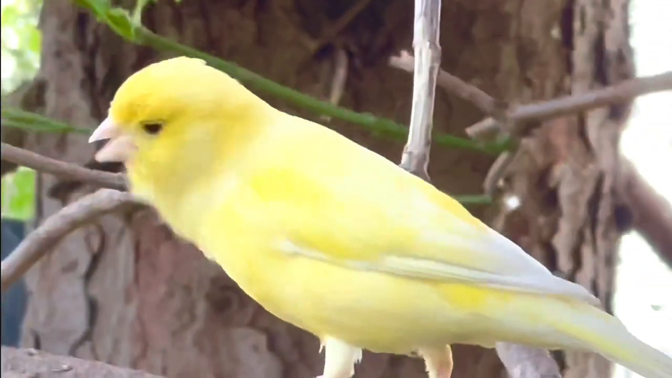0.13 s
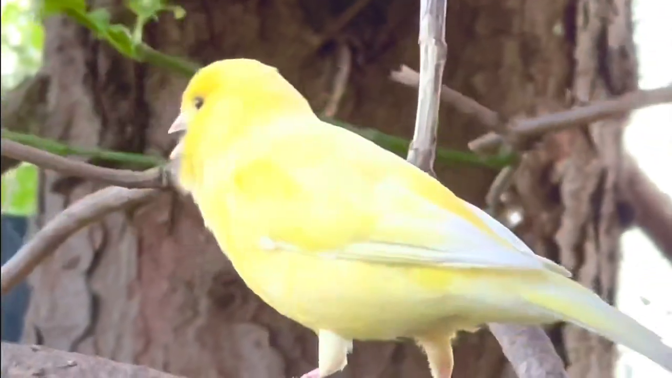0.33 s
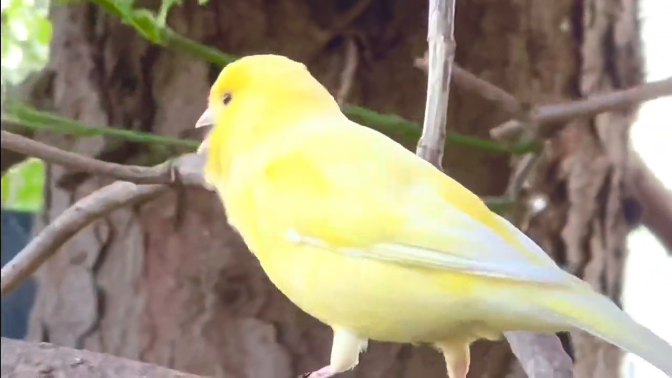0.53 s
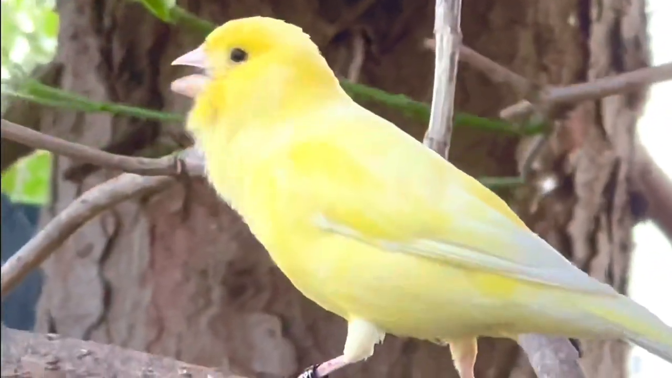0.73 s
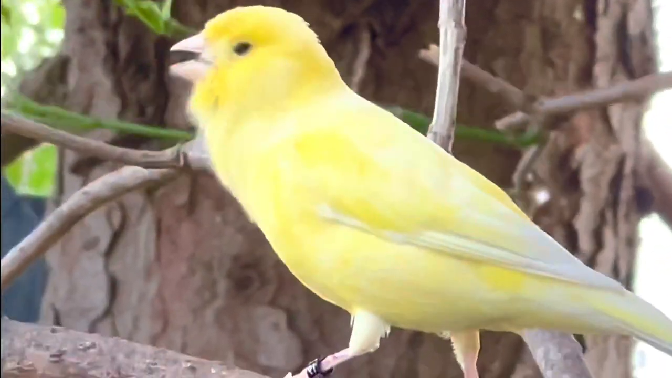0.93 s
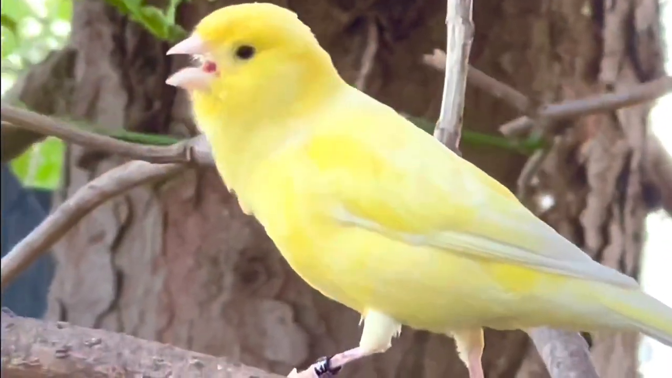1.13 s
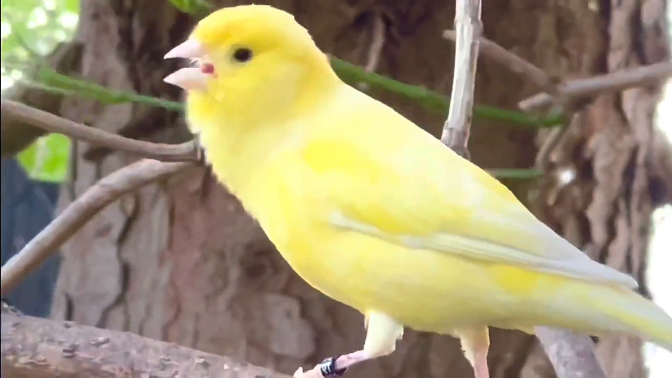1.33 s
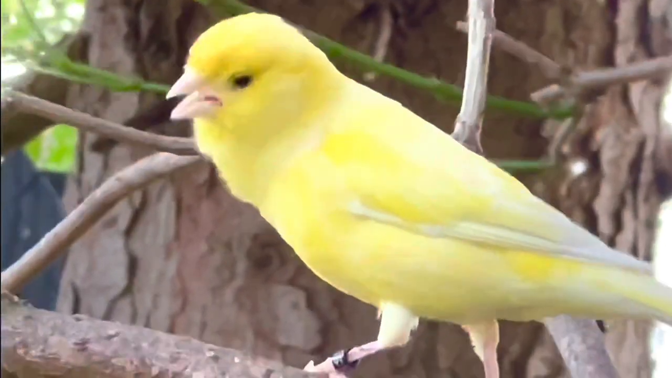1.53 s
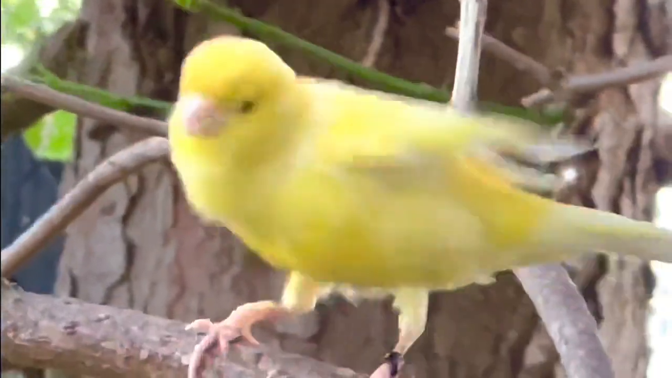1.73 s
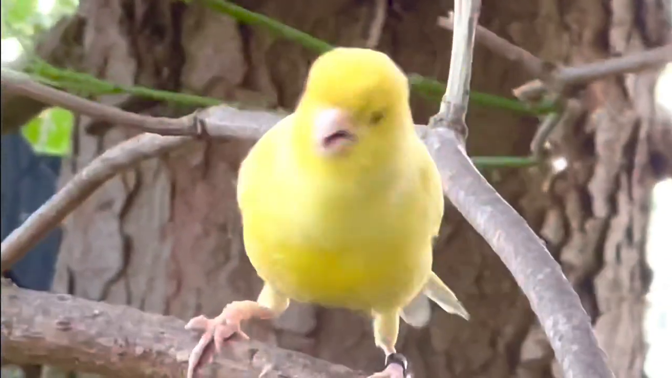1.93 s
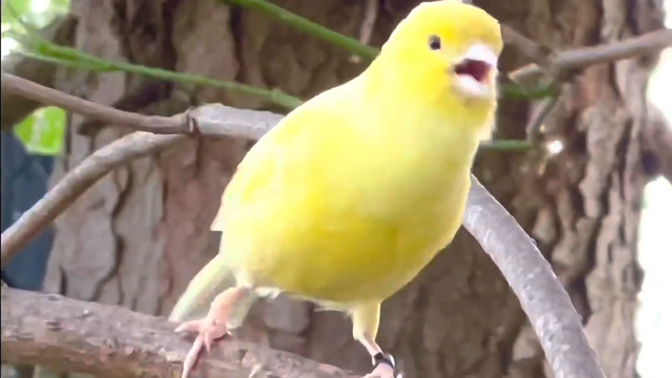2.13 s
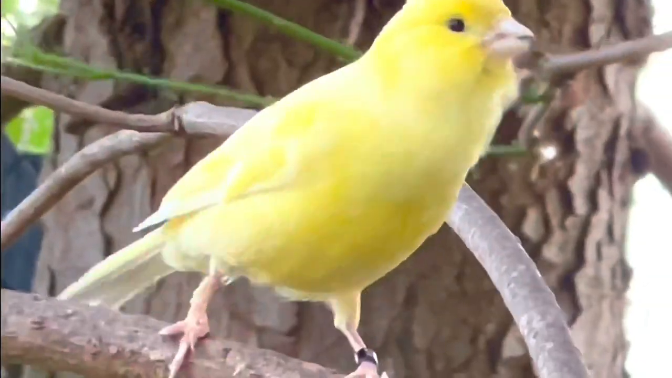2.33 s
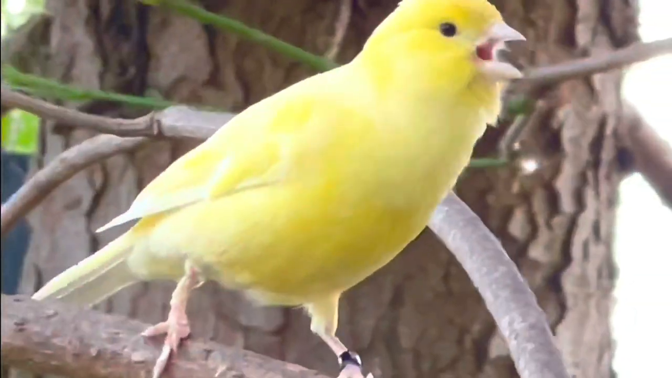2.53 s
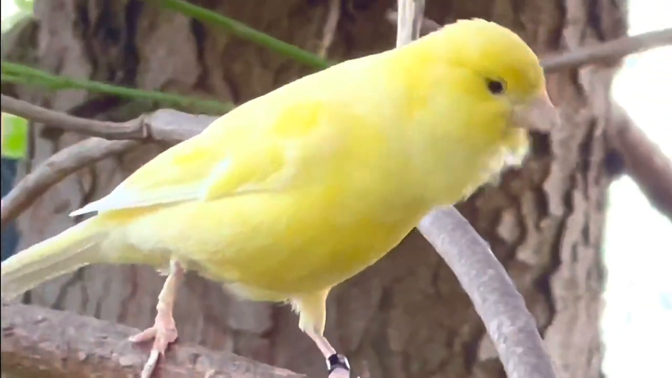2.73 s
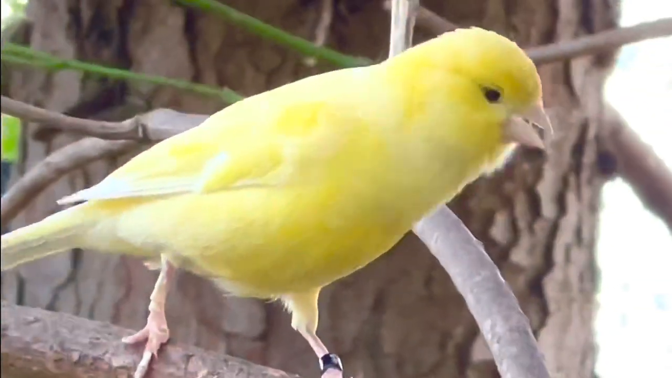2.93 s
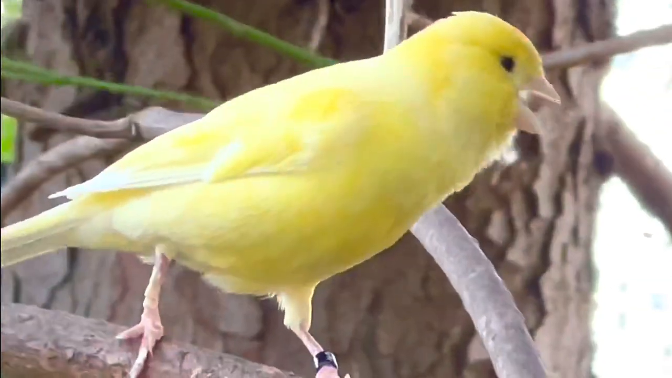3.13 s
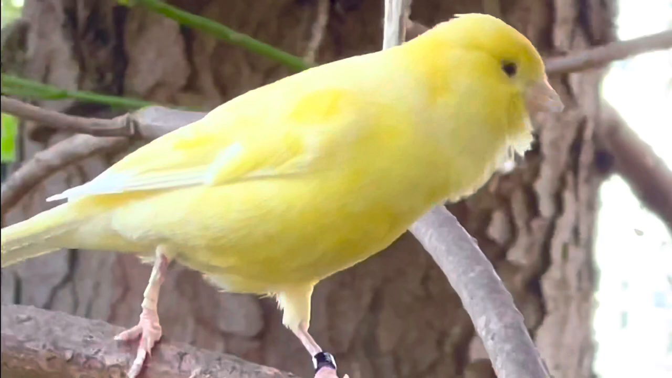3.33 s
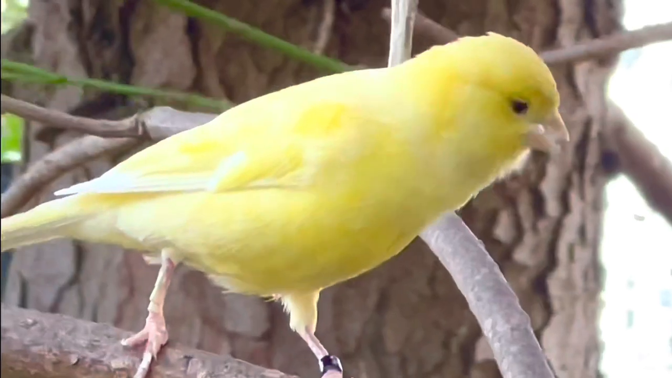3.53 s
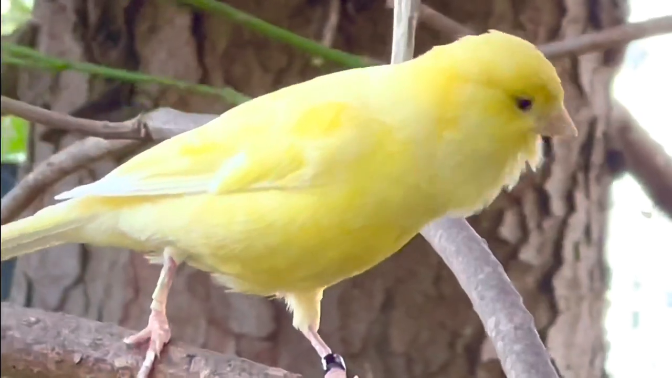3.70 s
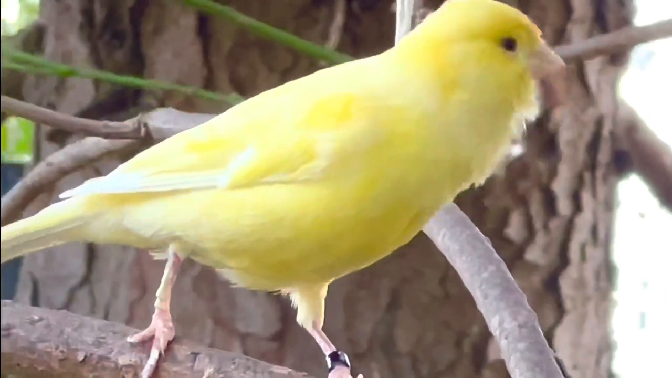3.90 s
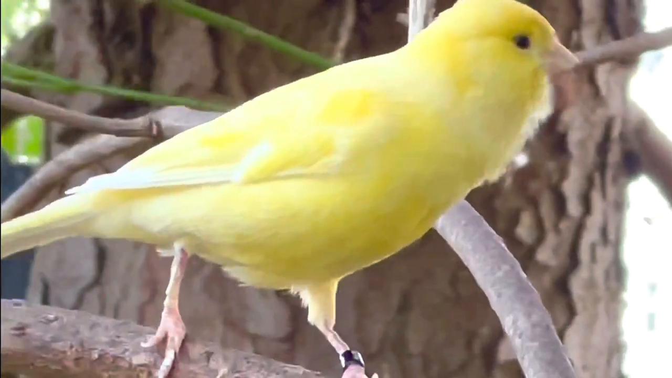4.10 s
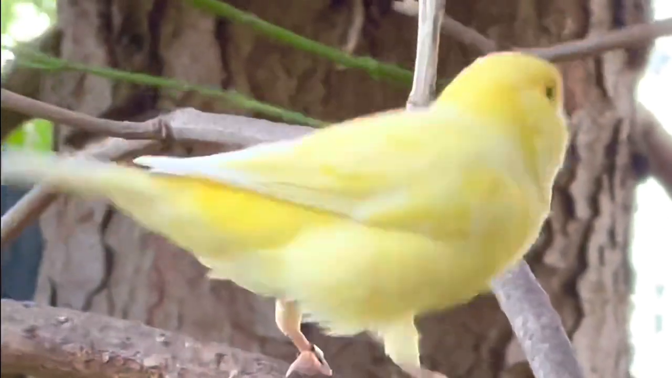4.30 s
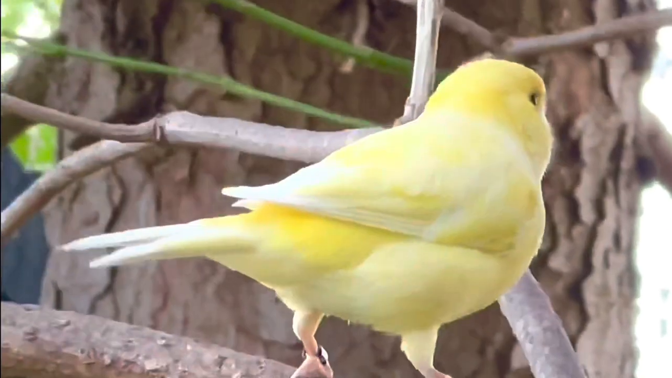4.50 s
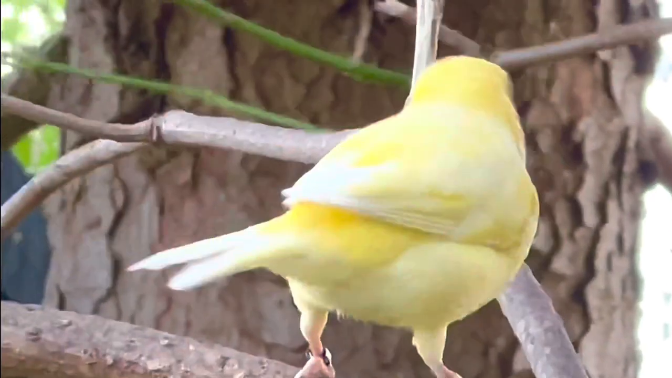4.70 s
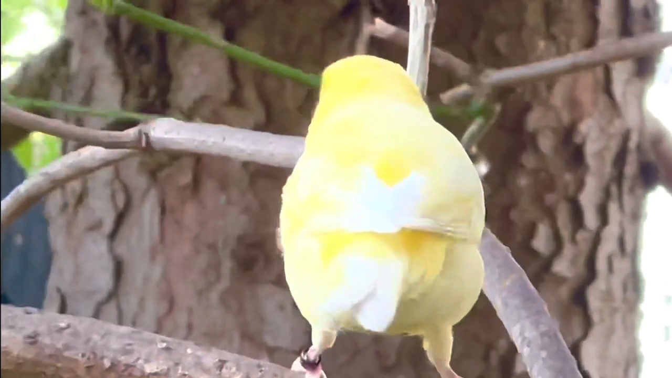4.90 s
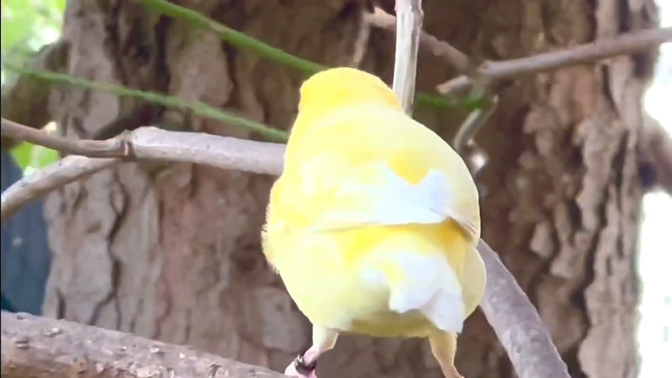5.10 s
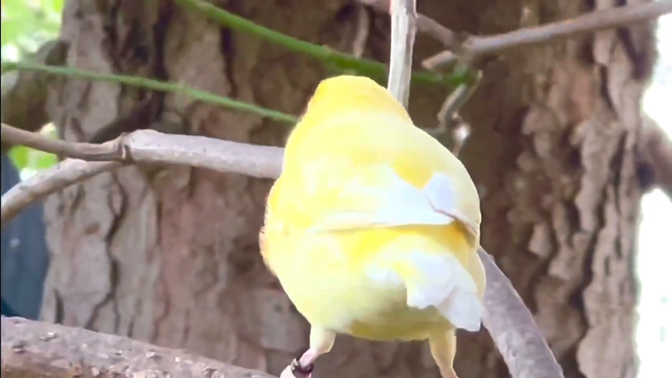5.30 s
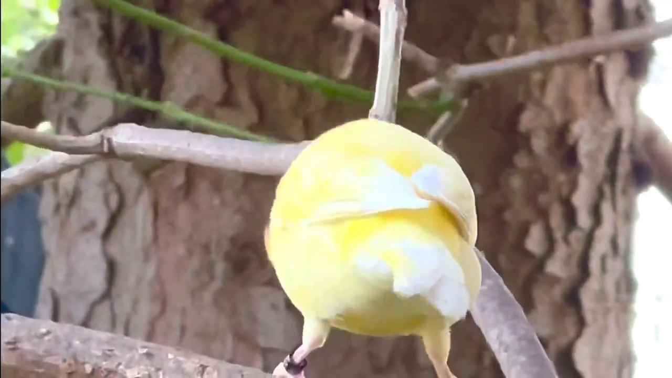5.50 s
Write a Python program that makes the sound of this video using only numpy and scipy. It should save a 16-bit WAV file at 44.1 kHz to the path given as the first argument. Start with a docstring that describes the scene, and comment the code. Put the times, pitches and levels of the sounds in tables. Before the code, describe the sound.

A canary sings close and bright in a garden aviary, with short diffuse echoes from branches and mesh. From 0 to 0.2 s come two high hooked whistles, dipping and climbing to a held top. From 0.25 to 1.9 s a fast trill runs at about fourteen notes a second, each a tick and a reedy dip with an upward flick, slowly deepening. From 2 to 3.65 s twelve louder pure whistles sweep steeply downward, about seven a second. Eight softer quick chips follow until 4.2 s, then the song stops. Other birds chirp faintly throughout, clustering at 5.3-5.5 s. Feet knock dully on wood at 1.65 s; wings flutter near 4.15 and 5.45 s. A distant dog yaps dully at 2.9 and 3.4 s. Low wind buffets early and at the end; a faint engine boom climbs from 1.5 s, with thin traffic whines and road wash swelling after 4.5 s.

```python
"""A canary sings close by in a garden aviary: two long hooks, a fast trill of short hooks, loud falling sweeps, chips.
Each note is a stack of gliding partials weighted by a beak filter, then echoed by the aviary.
Other birds chirp further off as curved whistles and noise-puff wing beats; feet knock on a branch.
A dog yaps twice in the distance as filtered partials; an engine pulls away as a boom and drone.
Wavering tones and shaped noise make passing traffic, the garden and road wash, and gusts on two microphones."""
import sys
import numpy as np
from scipy import signal
from scipy.fft import rfft, irfft, next_fast_len
from scipy.io import wavfile
from scipy.ndimage import uniform_filter1d, map_coordinates

SR = 44100
rng = np.random.default_rng(int(sys.argv[2]) if len(sys.argv) > 2 else 0)


def waveform_to_disk(signal):
    """Save audio, clipped to [-1, 1], as 16-bit WAV at the path in sys.argv[1]."""
    frames = np.transpose(np.atleast_2d(signal))
    scaled = np.clip(frames, -1, 1) * 32767
    samples = np.round(scaled).astype(np.int16)
    wavfile.write(sys.argv[1], SR, samples)


N = 244755

# Canary levels are before the beak filter unless stated.
# Long opening hooks. Each row: start in seconds, level in dB, extra level of the held top in dB.
LONG_HOOKS = [(-.033, 1.5, 0), (.111, -2, -1)]
# Dive, climb and held top of a long hook. Each row: seconds from start, pitch in Hz, level outside the beak in dB.
LONG_HOOK_GESTURE = [(0, 4746, -48), (.004, 3730, -29), (.009, 2396, -38), (.014, 1685, -39),
                     (.027, 2640, -26), (.039, 3113, -29.5), (.045, 4030, -37), (.053, 5080, -39),
                     (.063, 5467, -33), (.093, 5567, -30.5), (.102, 5600, -45)]
# Ticks without a note. Each row: time in seconds, level in dB.
LONE_TICKS = [(0.1043, -23.5), (1.967, -25)]
# Trill of hooks. Each row: tick time in seconds, tick level in dB, lowest pitch in Hz,
# seconds to the upward flick, hook level in dB.
TRILL_HOOKS = [(0.2482, -29, 1620, 0.039, -36.5), (0.3204, -29, 1756, .037, -36.5),
               (0.3912, -25.5, 1767, 0.039, -34.5), (0.4613, -22, 1750, 0.036, -34.5),
               (0.5308, -23.5, 1780, 0.039, -36), (0.6, -20, 1765, 0.041, -33),
               (0.6694, -22, 1745, 0.038, -33), (.7384, -22.5, 1725, 0.041, -33.5),
               (0.8072, -22, 1696, 0.039, -32), (0.8774, -21.5, 1585, .037, -33),
               (0.9472, -21.5, 1560, 0.039, -33), (1.0169, -21.5, 1560, 0.037, -32),
               (1.0883, -21, 1496, 0.038, -33), (1.1583, -19.5, 1485, 0.042, -33),
               (1.2298, -26, 1450, 0.045, -34), (1.302, -24, 1423, 0.041, -33.5),
               (1.3756, -26, 1474, .037, -33), (1.4478, -21.5, 1450, 0.042, -32),
               (1.5224, -19, 1432, .04, -33), (1.594, -24.5, 1350, 0.043, -33.5),
               (1.6693, -19.5, 1221, 0.043, -35), (1.7444, -22, 1327, 0.042, -34.5),
               (1.8173, -22.5, 1340, 0.042, -33.5), (1.891, -19.5, 1248, 0.042, -34.5)]
# Falling sweeps. Each row: start in seconds, start pitch in Hz, seconds until 2500 Hz, level in dB.
SWEEPS = [(1.9934, 4880, 0.056, -22), (2.108, 5490, .079, -21.5), (2.2453, 5430, 0.082, -21),
          (2.386, 5410, 0.08, -22), (2.5246, 5440, 0.086, -22), (2.671, 5530, 0.087, -22),
          (2.816, 5500, 0.087, -22), (2.9673, 5600, 0.09, -23.5), (3.1172, 5520, 0.086, -24),
          (3.269, 5520, 0.087, -24), (3.4194, 5560, 0.088, -24), (3.5702, 5550, 0.085, -24.5)]
# Shared end of every sweep. Each row: seconds from 2500 Hz, pitch in Hz, relative level in dB, overtone lift in dB.
SWEEP_FALL = [(-.049, 4540, -3.6, 1.5), (-.033, 4020, 0.2, 2), (-.022, 3513, 1, 1), (-.0085, 3000, 4, -2.5),
              (.002, 2453, 1.3, -13), (.0065, 2000, -11.5, -13), (.01, 1509, -11.5, -20),
              (0.015, 830, -33.5, -16)]
# Closing chips. Each row: time near 4500 Hz in seconds, seconds until 2500 Hz, level in dB, preceding blip in dB.
CHIPS = [(3.71, 0.013, -35, -41), (3.7748, 0.017, -32.5, -31), (3.844, 0.018, -33, -43),
         (3.911, .018, -33, -27), (3.979, .017, -32.5, -29.5), (4.047, 0.017, -33.5, -29.5),
         (4.114, .0175, -33.5, -28.5), (4.183, .019, -31.5, -31)]
# Throat, open beak and head filter. Each row: frequency in Hz, gain in dB.
BEAK = [(900, -3), (1700, -7.5), (2600, -3), (3500, 0), (4500, 2), (5600, -7.5), (6200, -16), (6900, -15),
        (8100, -23), (8800, -10.5), (10000, -3), (12000, 3), (15500, 2)]
# Partials 1, 2, .. at the syrinx, in dB: sweeps and long hooks; chips; trill hooks.
PURE_PARTIALS_DB = [-0.5, -24, -20.5, -25.5]
CHIP_PARTIALS_DB = [0, -31, -21.5]
HOOK_PARTIALS_DB = [-3.5, 0.5, -15, -7.5, -14, -14.5, -19]
# Other birds. Each row: start in seconds, length in seconds, start, middle and end pitch in Hz, level in dB,
# roughness from 0 to 1.
CHIRPS = [(.343, 0.035, 4750, 4800, 4750, -49, 0), (3.9, .025, 1950, 1860, 1800, -56, 0.25),
          (3.95, 0.0346, 2756, 2730, 2750, -54, .2), (0.568, 0.034, 3930, 3710, 3830, -42.5, 0),
          (.57, 0.058, 7500, 7460, 7550, -57.5, 0.42), (0.687, 0.033, 6200, 5680, 5330, -46, 0.12),
          (0.696, 0.019, 7040, 7150, 7300, -51.5, 0.3), (1.417, 0.042, 6100, 6300, 6240, -56, 0.24),
          (1.471, 0.11, 4520, 4327, 4420, -44.5, 0.02), (1.656, 0.023, 6250, 5770, 5470, -53, 0.3),
          (1.695, 0.019, 7000, 6560, 5900, -53, 0), (1.74, 0.032, 6080, 5700, 5170, -50, 0.38),
          (1.838, 0.035, 6600, 5650, 5050, -50, 0.1), (1.93, 0.043, 6400, 5640, 4870, -54, .2),
          (2.018, 0.042, 7600, 6300, 5140, -54.5, 0.1), (3.753, 0.026, 4590, 5560, 5550, -53, 0.8),
          (3.808, 0.027, 3390, 3400, 3420, -48, 0.35), (4.015, 0.02, 7500, 7370, 7300, -62, 0.56),
          (3.71, 0.087, 7400, 7150, 7300, -58, 0.5), (4.256, 0.09, 7100, 6970, 7210, -61.5, 0.46),
          (4.454, 0.092, 2400, 2236, 2397, -60, 0.15), (4.639, 0.1, 2190, 2393, 3080, -61.5, 0.06),
          (5.107, 0.057, 2720, 2850, 2770, -59.5, 0.21), (5.133, 0.013, 5620, 5840, 5900, -52.5, 0.17),
          (5.275, 0.033, 2810, 4310, 5000, -58, 0.16), (5.31, 0.031, 4270, 2850, 5190, -47.5, 0),
          (5.38, 0.031, 5500, 5950, 5060, -49, 0.2), (5.38, .012, 3200, 4300, 4750, -51, .05),
          (5.393, 0.038, 4770, 3780, 3230, -50, 0.16), (5.407, 0.045, 4980, 4420, 4100, -48, 0.15),
          (5.423, 0.0136, 5900, 6800, 6900, -46.5, 0.1), (5.424, 0.034, 5700, 5620, 5420, -50, 0.08),
          (5.52, 0.026, 5200, 4810, 4340, -48, 0.2)]
# Wing beats. Each row: start in seconds, length in seconds, level in dB.
WING_BEATS = [(4.132, 0.042, -44), (4.168, 0.029, -44), (5.445, 0.027, -41), (5.481, 0.023, -43)]
# Wing-beat spectrum. Each row: frequency in Hz, gain in dB.
FEATHERS = [(1500, -12), (3000, 0), (5500, 2.5), (8000, -1.5), (12000, -11), (14000, -20)]
# Distant yaps. Each row: start in seconds, length in seconds, top pitch in Hz.
YAPS = [(2.928, .092, 467), (3.39, .18, 773)]
# Dog's mouth filter, dull with distance. Each row: frequency in Hz, gain in dB.
MUZZLE = [(200, -13), (450, -6.5), (800, 2), (1020, -2), (1200, -13.5), (2000, -38)]
# Engine pulling away. Each row: time in seconds, boom pitch in Hz, level in dB.
ENGINE = [(1.3, 39.9, -73), (1.6, 41.24, -53), (2.2, 42.5, -49), (2.74, 45.6, -45.5), (3.11, 49.35, -47),
          (3.71, 60.05, -50), (4.399, 66.85, -47.5), (5, 77.8, -49), (5.55, 70, -66)]
# Brief dips of the engine. Each row: centre in seconds, width in seconds, depth in dB.
ENGINE_DIPS = [(3.22, 0.033, -13), (4, 0.18, -8), (4.75, 0.15, -5)]
# Feet landing on the branch: time in seconds, level in dB.
HOP = (1.65, -41)
# Passing traffic. Each row: loudest time in seconds, top pitch in Hz, peak level in dB, fade in dB per second squared.
WHINES = [(2.1, 606.4, -59.5, 45), (4.85, 597, -61.5, 61.5)]
# Garden and road wash spectrum. Each row: frequency in Hz, gain in dB.
WASH = [(30, -18), (60, -16), (100, -0.5), (200, -2), (350, -3.5), (600, -5.5), (1000, -10), (2000, -14.5),
        (4000, -17.5), (7000, -17.5), (10000, -22.5), (12000, -19.5), (13000, -18), (16000, -65)]
# Wash swelling as traffic nears. Each row: time in seconds, level in dB, extra treble at 6 kHz in dB.
WASH_LEVEL = [(0, -53, -1), (1, -54, 0.5), (2, -53, 0), (3, -55.5, 1), (4, -54, -0.5), (4.4, -53, -3),
              (4.8, -50, 0), (5.2, -47.5, 1.5), (5.55, -48.5, 4.5)]
# Likeness of the wash in the two channels. Each row: frequency in Hz, correlation.
WASH_LIKENESS = [(60, 0.37), (120, 0.79), (250, 0.95), (700, 0.45), (1500, 0.97), (2200, 1), (7000, 1),
                 (8600, 0.73), (11000, 1)]
# Gusts on the microphones. Each row: time of reaching the peak in seconds, peak level in dB, hold in seconds.
GUSTS = [(0, -65, .005), (0.067, -46, 0.028), (.202, -52, .005), (.27, -69, 0.033), (0.453, -50, .03),
         (.708, -42, 0.051), (.83, -53, 0.054), (0.987, -45.5, 0.0072), (1.305, -57, .005),
         (5.243, -50.5, .08), (5.375, -45, 0.12), (5.511, -35, 0.0046)]
# Gust and wood-knock spectra. Each row: frequency in Hz, gain in dB.
GUST_COLOUR = [(20, -23), (45, 8.5), (80, 3.5), (150, -11.5), (400, -41.5)]
WOOD_COLOUR = [(100, -3), (300, -3), (1000, -12), (2000, -36)]
# Echoes of branches, mesh and ground. Each row: delay in seconds, level in dB.
ECHOES = [(.0011, -45.5), (.0023, -23.5), (.0037, -17.5), (.0058, -18), (.0085, -19.5), (.012, -18.5)]
# Aviary decay. Each row: frequency in Hz, time to fall 60 dB in seconds.
AVIARY_T60 = [(500, 0.17), (3000, 0.098), (6000, 0.064), (12000, 0.072)]
# Treble scattered back by foliage. Each row: frequency in Hz, gain in dB.
TAIL_COLOUR = [(1200, -8), (2200, -2.5), (3000, -1.5), (5000, 4), (12000, 5)]
# Stereo widening phase. Each row: frequency in Hz, lag of the left channel in radians.
LEFT_LAG = [(100, 0), (300, -.2), (775, -.4), (1150, -.5), (1700, 0), (3300, 0), (3800, .1), (4400, .55),
            (4820, 1.3), (4995, 2.8), (5167, 4.4), (5340, 5.3), (5512, 5.7), (5900, 6.2), (7500, 6.35),
            (8600, 7), (10200, 7.9), (12200, 8.9), (13500, 9.4), (16000, 9.5)]
# Stereo balance. Each row: frequency in Hz, left minus right in dB.
LEFT_TILT = [(60, 0), (110, 0), (180, -1.5), (300, -3.5), (500, -4.5), (800, -3.5), (1200, -.3), (2000, 0)]

EDGE_HZ = 16000  # band limit
HELD_HZ = 5200  # above this a long hook is held
NOTE_SPREAD_DB = 1.5  # partials above the second differ by chance from note to note
SHALLOW_HZ, DEPTH_HZ = 1794, 300  # lowest pitch of a shallow hook; one step of depth below it
DIVE_S, DIVE_LATER_S_PER_STEP = 0.0037, 0.0023  # tick to dive
BOTTOM_S, BOTTOM_LATER_S_PER_STEP = 0.0135, 0.002  # tick to lowest pitch
SHELF_HZ, SHELF_SAG_HZ_PER_STEP = 2125, 152  # pitch before the flick
DIVE_GAIN_DB_PER_STEP, FLICK_GAIN_DB_PER_STEP = 4.5, 4
CHIP_KNEE = 0.63  # share of the fall at which a chip passes 3500 Hz
GUST_RISE_DB_PER_S, GUST_FALL_DB_PER_S, LULL_DB = 500, 310, -67
WHINE_SAG_HZ_PER_DB = 7
YAP_LOW_HZ, YAP_LOW_DB, YAP_DB_PER_OCTAVE = 218.2, -48.5, 7.5
YAP_OVERTONE_DB_PER_OCTAVE = 1.5  # overtone lift before the muzzle filter
YAP_LIFT, YAP_TOP, YAP_SHUT = 0.103, 0.78, 0.94  # shares of length: glide begins, peaks, mouth shuts
YAP_SAG = 0.954  # pitch ratio of the sag


def amp(db):
    """Decibels to amplitude."""
    return 10 ** (np.asarray(db) / 20)


def evened(x):
    """Scales to an rms of 1."""
    return x / np.sqrt(np.mean(x ** 2) + 1e-20)


def read(points, hz):
    """Reads a curve on a log frequency axis."""
    f, value = np.transpose(points)
    return np.interp(np.log(hz + 1), np.log(f + 1), value)


def add(mix, s, sound):
    """Adds a sound at a time in seconds, cropped to the mix."""
    at = round(s * SR)
    part = mix[max(at, 0):][:len(sound) + min(at, 0)]
    part += sound[max(-at, 0):][:len(part)]


def coloured(x, points):
    """Filters by a (Hz, dB) spectrum."""
    spectrum = rfft(x)
    gain = amp(read(points, np.fft.rfftfreq(len(x), 1 / SR)))
    return irfft(spectrum * gain, len(x))


def wobble(count, hz):
    """Smooth chance of rms about 1 that changes about hz times a second."""
    knots = rng.standard_normal(int(count * hz / SR) + 4)
    return map_coordinates(knots, [np.arange(count) * hz / SR])


def voice(rows, partials_db, tract, smooth_s=0.001, flutter_db=1.26):
    """Gliding partials weighted by the tract; rows are (s, Hz, dB) and optionally an overtone lift in dB."""
    s, *columns = np.transpose(rows)
    t = np.arange(s[0], s[-1], 1 / SR)
    smooth = int(smooth_s * SR) + 1
    hz, db, *lift_db = (uniform_filter1d(np.interp(t, s, c), smooth) for c in columns)
    turns = np.cumsum(hz) / SR + rng.random()
    stack = np.zeros(len(t))
    for k, partial_db in enumerate(partials_db, 1):
        level_db = partial_db + read(tract, k * hz)
        level_db = level_db + min(k - 1, 2) * sum(lift_db)
        level_db = level_db + (k > 2) * NOTE_SPREAD_DB * rng.standard_normal()
        level_db = level_db + flutter_db * wobble(len(t), 253.6)
        stack += amp(level_db) * (k * hz < EDGE_HZ) * np.sin(2 * np.pi * k * turns)
    edge = np.minimum(1, np.minimum(t - s[0], s[-1] - t) / 0.00016)
    return s[0], np.sqrt(2) * amp(db) * stack * edge


def long_hook(s, db, top_db):
    """Pitch dives, climbs and holds; the beak's gain at the fundamental is undone to set the outside level."""
    rows = [(s + u, hz, db + d + top_db * (hz > HELD_HZ) - read(BEAK, hz)) for u, hz, d in LONG_HOOK_GESTURE]
    return voice(rows, PURE_PARTIALS_DB, BEAK)


def tick(s, db):
    """A four-millisecond upward blip of two partials."""
    rows = [(s - 0.0022, 4600, db - 19), (s, 5450, db), (s + 0.0019, 5800, db - 9.5)]
    return voice(rows, [0, -20], BEAK, smooth_s=0.00042)


def hook(s, low_hz, length_s, db):
    """Pitch dives, climbs with growing overtones, then snaps up; deeper hooks dive later and snap harder."""
    depth = (SHALLOW_HZ - low_hz) / DEPTH_HZ
    dive = s + DIVE_S + DIVE_LATER_S_PER_STEP * depth
    low = s + BOTTOM_S + BOTTOM_LATER_S_PER_STEP * depth
    up = s + length_s
    shelf_hz = SHELF_HZ - SHELF_SAG_HZ_PER_STEP * depth
    drop = [(dive, 3900, db - 6, -20),
            (dive + 0.002063, 3150, db + DIVE_GAIN_DB_PER_STEP * depth, -14),
            (low - 0.004, 1.2 * low_hz, db + 1.8, -2.5),
            (low - 0.0015, 1.03 * low_hz, db, -3),
            (low + 0.002, low_hz, db + 0.23, -3)]
    climb = [(up - 0.013, shelf_hz - 0.31 * (shelf_hz - low_hz), db - 0.4, -0.6),
             (up - 0.005, shelf_hz, db, 0.3)]
    flick = [(up - 0.003, 2350, db - 1.5, -12),
             (up - 0.0011, 3450, db + 6 + FLICK_GAIN_DB_PER_STEP * depth, -18),
             (up + 0.00104, 4300, db - 11, -14)]
    return voice(drop + climb + flick, HOOK_PARTIALS_DB, BEAK, flutter_db=2.5)


def sweep(s, hz, length_s, db):
    """A soft slow entry near the top that opens up suddenly, then the shared fall."""
    entry_s, drop_hz = length_s + SWEEP_FALL[0][0], hz - SWEEP_FALL[0][1]
    entry = [(s - 0.006, hz + 250, db - 17, 0),
             (s + 0.00383, hz - 80, db - 4.5, 0),
             (s + 0.55 * entry_s, hz - 0.447 * drop_hz, db - 5, 0),
             (s + 0.77 * entry_s, hz - 0.76 * drop_hz, db - 2, 0)]
    fall = [(s + length_s + u, f, db + d, lift) for u, f, d, lift in SWEEP_FALL]
    return voice(entry + fall, PURE_PARTIALS_DB, BEAK)


def chip_blip(s, db):
    """A short falling blip just ahead of a chip."""
    rows = [(s - 0.008, 5400, db - 29), (s - 0.0055, 5150, db), (s - 0.003, 5000, db - 17)]
    return voice(rows, PURE_PARTIALS_DB, BEAK)


def chip(s, length_s, db):
    """A quick pure fall."""
    end = s + length_s
    fall = [(s - 0.001, 4700, db - 21), (s + 0.00208, 4250, db - 5),
            (s + CHIP_KNEE * length_s, 3500, db - 2), (end, 2500, db + 8.5)]
    close = [(end + 0.00266, 1950, db + 1.5), (end + 0.00545, 1500, db + 2), (end + 0.0081, 1300, db - 19)]
    return voice(fall + close, CHIP_PARTIALS_DB, BEAK)


def canary():
    """The song: every note follows the gesture of its phrase."""
    out = np.zeros(N)
    for row in LONG_HOOKS:
        add(out, *long_hook(*row))
    for row in LONE_TICKS:
        add(out, *tick(*row))
    for s, tick_db, *shape in TRILL_HOOKS:
        add(out, *tick(s, tick_db))
        add(out, *hook(s, *shape))
    for row in SWEEPS:
        add(out, *sweep(*row))
    for s, length_s, db, blip_db in CHIPS:
        add(out, *chip_blip(s, blip_db))
        add(out, *chip(s, length_s, db))
    return out


def wind():
    """Lumpy low pressure in gusts, mostly shared by the two microphones."""
    t = np.arange(N) / SR
    both, left, right = (evened(coloured(rng.standard_normal(N), GUST_COLOUR)) for _ in range(3))
    level = amp(LULL_DB)
    for s, db, hold_s in GUSTS:
        rise_db = GUST_RISE_DB_PER_S * np.maximum(s - t, 0)
        fall_db = GUST_FALL_DB_PER_S * np.maximum(t - s - hold_s, 0)
        level = level + amp(db - rise_db - fall_db)
    return (both + 0.44 * np.array([left, right])) * level


def wash():
    """Garden and road noise: random short-time spectra with drifting patches, partly alike in both channels."""
    frames, hz = N // 256 + 5, np.fft.rfftfreq(1024, 1 / SR)
    a, b, c, d, patches = rng.standard_normal((frames, 513, 5)).T
    patches = uniform_filter1d(patches, size=12, axis=0)
    patches = evened(uniform_filter1d(patches, size=14, axis=1))
    s, db, treble_db = np.transpose(WASH_LEVEL)
    t = np.arange(frames) * 256 / SR
    same = np.clip(read(WASH_LIKENESS, hz), -1, 1)[:, None]
    left = a + 1j * b
    right = same * left + np.sqrt(1 - same ** 2) * (c + 1j * d)
    tilt_db = np.outer(np.clip(hz / 6000, 0, 2), np.interp(t, s, treble_db))
    z = np.array([left, right]) * amp(read(WASH, hz)[:, None] + 0.95 * patches + tilt_db)
    noise = signal.istft(z, nperseg=1024, noverlap=768)[1][:, :N]
    return evened(noise) * amp(np.interp(np.arange(N) / SR, s, db))


def chirp(length_s, start_hz, middle_hz, end_hz, db, rough):
    """A whistle on a parabolic glide; roughness wavers its pitch and level."""
    u = np.arange(0, 1, 1 / (length_s * SR))
    hz = start_hz * (1 - u) * (1 - 2 * u) + 4 * middle_hz * u * (1 - u) + end_hz * u * (2 * u - 1)
    hz = hz + 600 * rough * wobble(len(u), 502)
    level = np.sqrt(2) * amp(db + 2.7 * rough * wobble(len(u), 270))
    return level * np.sin(2 * np.pi * np.cumsum(hz) / SR) * signal.windows.tukey(len(u), 0.25)


def wing_beat(length_s, db):
    """A puff of feather-coloured noise."""
    puff = evened(coloured(rng.standard_normal(round(length_s * SR)), FEATHERS))
    return amp(db) * puff * np.hanning(len(puff))


def neighbours():
    """Other birds: chirps and wing beats."""
    out = np.zeros(N)
    for s, *shape in CHIRPS:
        add(out, s, chirp(*shape))
    for s, *shape in WING_BEATS:
        add(out, s, wing_beat(*shape))
    return out


def engine():
    """A boom, climbing until it fades, and a loose body drone, throbbing with uneven firing."""
    s, hz, db = np.transpose(ENGINE)
    t = np.arange(N) / SR
    turns = np.cumsum(np.interp(t, s, hz) * (1 + 0.0515 * wobble(N, 32))) / SR
    throb = 1 + 0.67 * np.sin(2 * np.pi * turns / 2.3)
    boom = np.sin(2 * np.pi * turns) * throb
    drone_hz = 92 + 9 * wobble(N, 15)
    drone = 0.52 * np.sin(2 * np.pi * np.cumsum(drone_hz) / SR) * wobble(N, 15)
    dips_db = sum(d * np.exp(-((t - at) / width) ** 2) for at, width, d in ENGINE_DIPS)
    level_db = np.interp(t, s, db, left=-90) + dips_db + 4.15 * wobble(N, 23.04)
    return evened(boom + drone) * amp(level_db)


def hop():
    """A short dull knock of wood: decaying low noise."""
    out, t = np.zeros(N), np.arange(0, 0.02, 1 / SR)
    s, db = HOP
    knock = evened(coloured(rng.standard_normal(len(t)), WOOD_COLOUR))
    add(out, s, amp(db) * knock * np.exp(-t / 0.011))
    return out


def whine():
    """A thin fuzzy tone that wavers, rising and sinking in pitch and level as each vehicle passes."""
    t, out = np.arange(N) / SR, np.zeros(N)
    for s, top_hz, db, fade in WHINES:
        fade_db = np.minimum(fade * (t - s) ** 2, 40)
        hz = top_hz - WHINE_SAG_HZ_PER_DB * fade_db + 25 * wobble(N, 60)
        turns = np.cumsum(hz) / SR
        out += np.sin(2 * np.pi * turns) * amp(db - fade_db + 3.3 * wobble(N, 30))
    return out


def dog():
    """Two yaps, driven louder as they climb, dulled by distance, with one late echo off a wall."""
    out, ease = np.zeros(N), np.linspace(0, 1, num=9)
    for s, length_s, top_hz in YAPS:
        octaves = np.log2(top_hz / YAP_LOW_HZ) * np.sin(np.pi / 2 * ease) ** 2
        db = YAP_LOW_DB + YAP_DB_PER_OCTAVE * octaves
        glide = zip(YAP_LIFT + (YAP_TOP - YAP_LIFT) * ease, YAP_LOW_HZ * 2 ** octaves,
                    db, YAP_OVERTONE_DB_PER_OCTAVE * octaves)
        rows = [(0, YAP_LOW_HZ, YAP_LOW_DB - 10, 0), *glide,
                (YAP_SHUT, YAP_SAG * top_hz, db[-1] - 1, -3),
                (1, YAP_SAG ** 2 * top_hz, db[-1] - 27, -3)]
        rows = [(s + u * length_s, *rest) for u, *rest in rows]
        s, yap = voice(rows, [-1.5, -3, -2.5, 0.5, -6, -7], MUZZLE, smooth_s=0.013, flutter_db=3)
        add(out, s, yap)
        add(out, s + 0.047, amp(-16.5) * yap)
    return out


def aviary(x, tail_db):
    """Direct sound, near echoes, then three random tails that fade in and out in turn, keeping the reverb even."""
    near = np.zeros(SR // 50)
    for s, db in [(0.00025, 0)] + ECHOES:
        add(near, s, amp([db]))
    out = signal.fftconvolve(x, near)[:N]
    at = np.arange(260, SR // 2 - 20, 20)
    for k in range(3):
        # sparse random taps
        taps = np.zeros(SR // 2)
        taps[at + rng.integers(0, 20, len(at))] = rng.choice([-1., 1.], len(at))
        hz, t, z = signal.stft(taps, SR, nperseg=128)
        fall_db = -60 * t / read(AVIARY_T60, hz)[:, None]
        decay = amp(fall_db) + amp(fall_db / 3 - 9)  # far trees ring on longer than the mesh
        colour = amp(read(TAIL_COLOUR, hz)[:, None])
        tail = signal.istft(z * colour * decay, SR, nperseg=128)[1]
        share = np.sqrt(2 / 3) * np.cos(2 * np.pi * (3.4 * np.arange(N) / SR + k / 3))
        out += amp(tail_db) * signal.fftconvolve(x * share, tail / np.linalg.norm(tail))[:N]
    return out


def scene():
    """Birds in the aviary, with the sounds around it; the further birds get more tail."""
    birds = aviary(canary(), -10.5) + aviary(neighbours(), -3.5)
    return birds + wind() + wash() + engine() + hop() + whine() + dog()


def record(dry):
    """Widens to stereo by left phase, with the left quieter in the low mids; a bass cut, then the band limit."""
    size = next_fast_len(N + 4096)
    hz = np.fft.rfftfreq(size, 1 / SR)
    tilt_db = read(LEFT_TILT, hz)
    left = amp(tilt_db / 2) * np.exp(-1j * read(LEFT_LAG, hz))
    right = amp(-tilt_db / 2)
    low_cut = 1 / (1 + (36 / (hz + 1)) ** 6)
    wet = irfft(rfft(dry, size) * np.array([left, right]) * low_cut, size)[:, :N]
    band_limit = signal.firwin(511, EDGE_HZ, window=("kaiser", 9), fs=SR)
    return signal.oaconvolve(wet, band_limit[None], "same")


dry = scene()
out = record(dry)
waveform_to_disk(out)
```